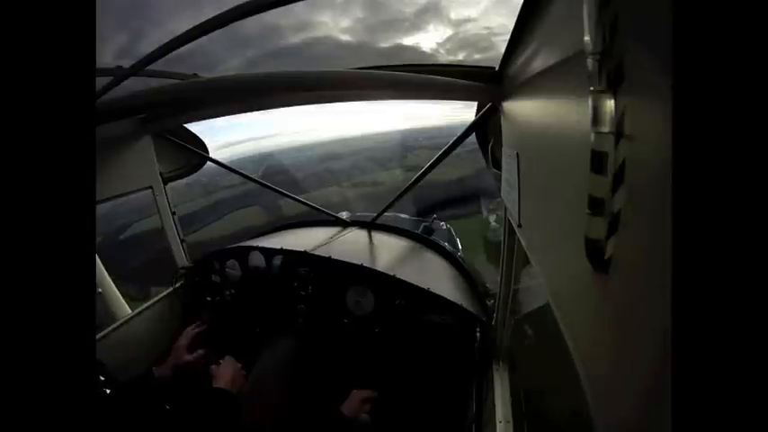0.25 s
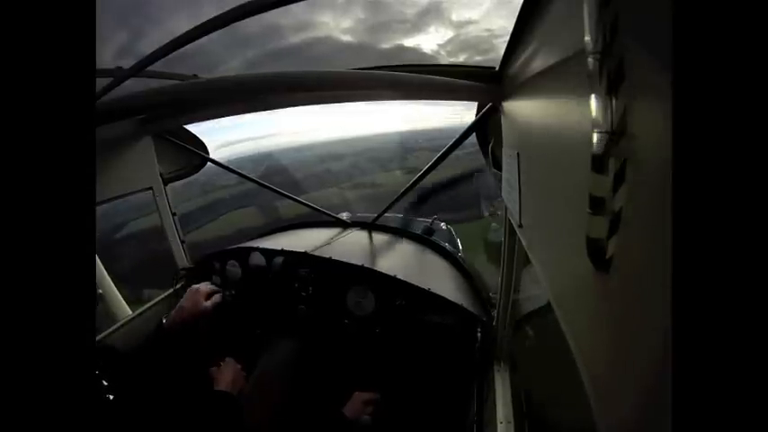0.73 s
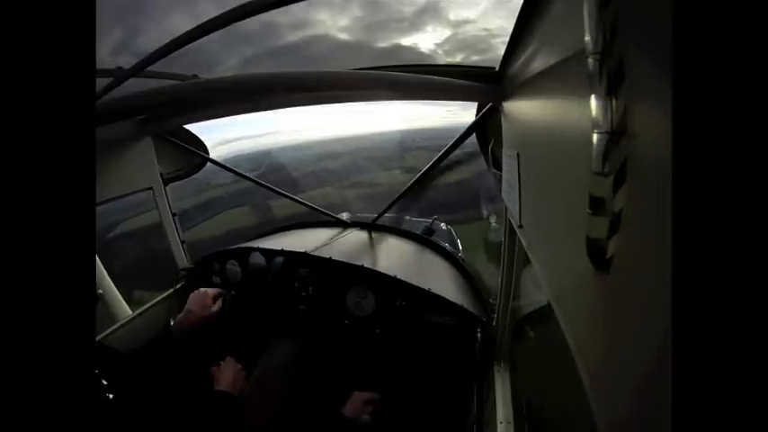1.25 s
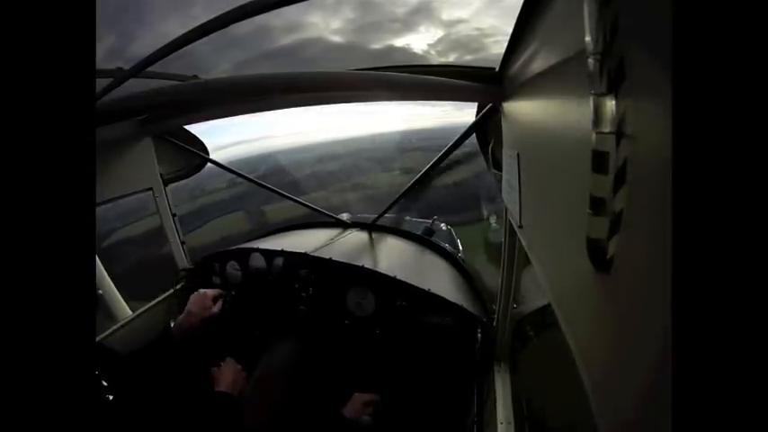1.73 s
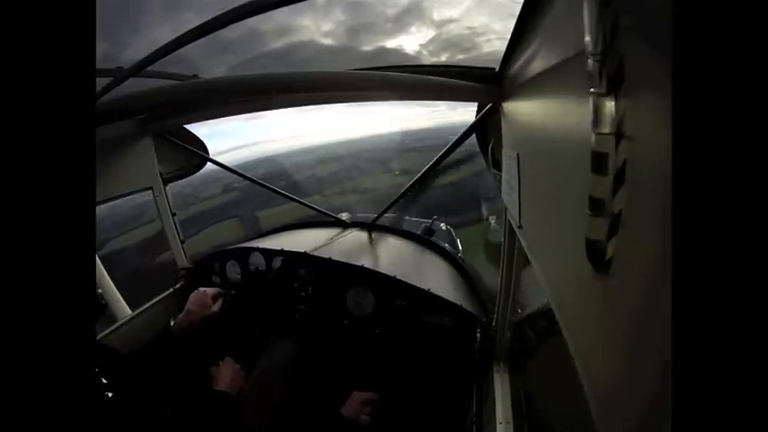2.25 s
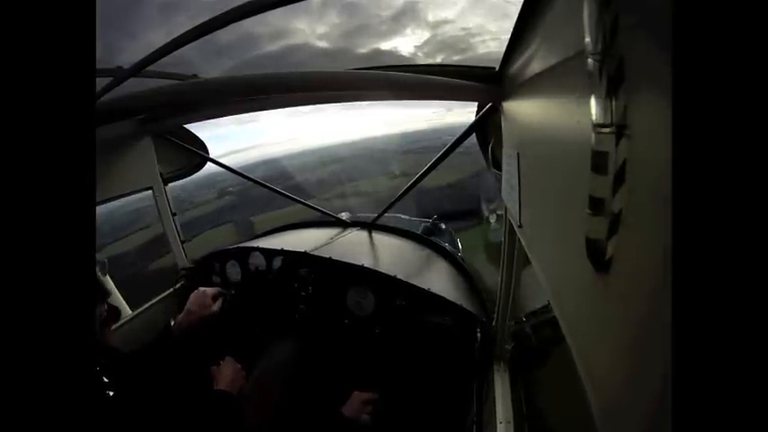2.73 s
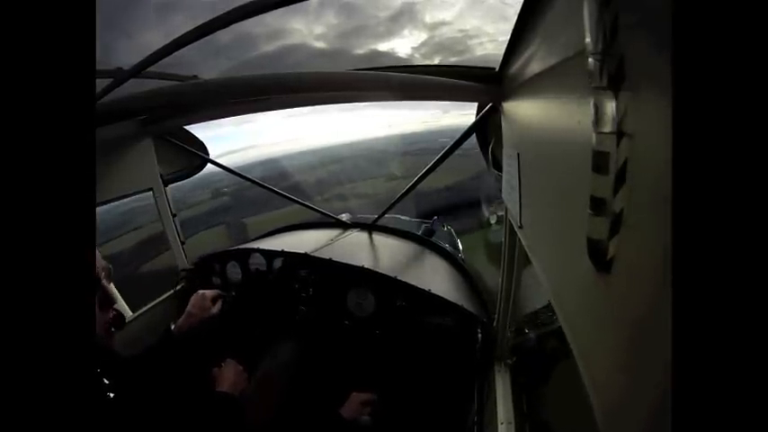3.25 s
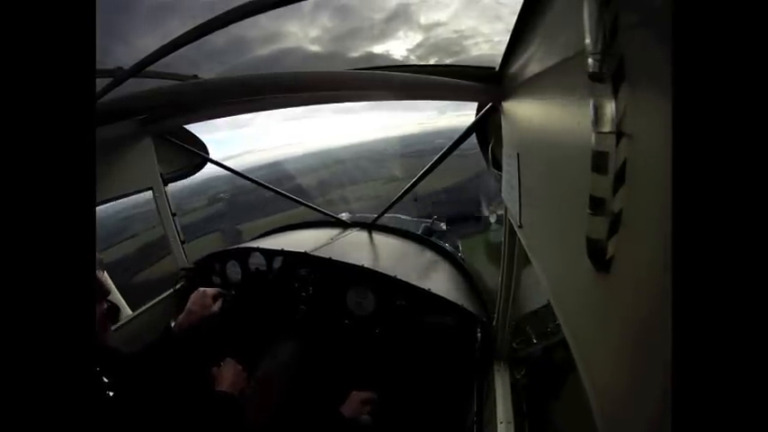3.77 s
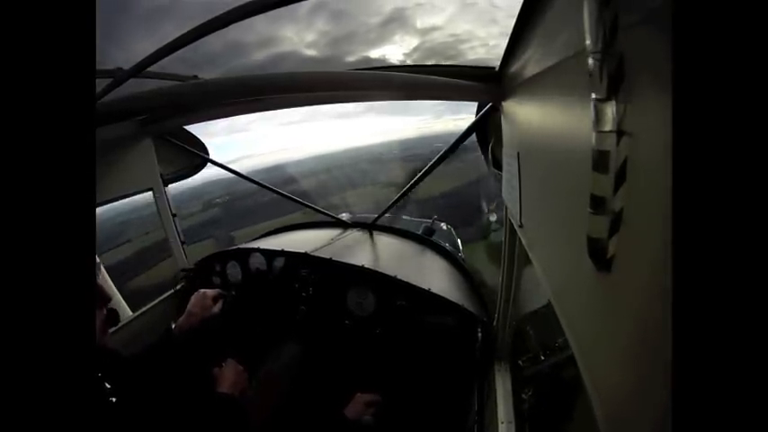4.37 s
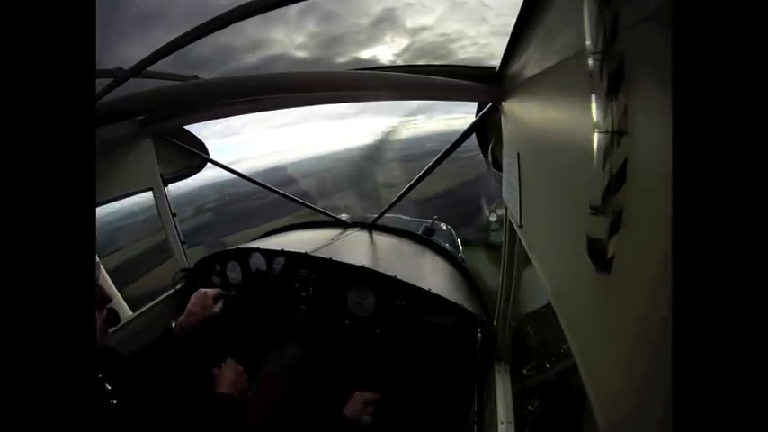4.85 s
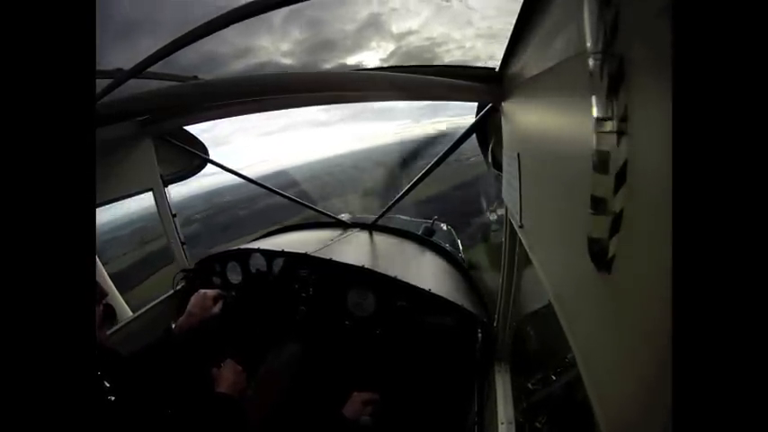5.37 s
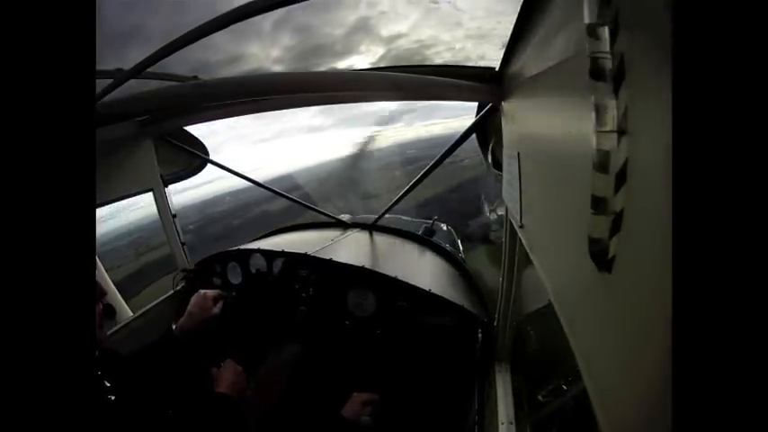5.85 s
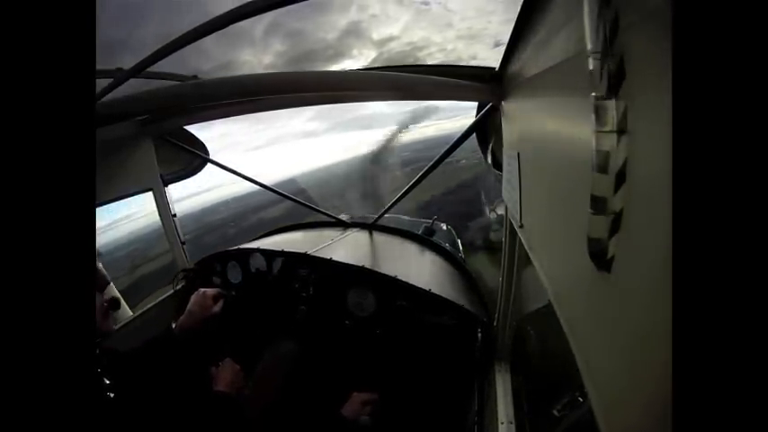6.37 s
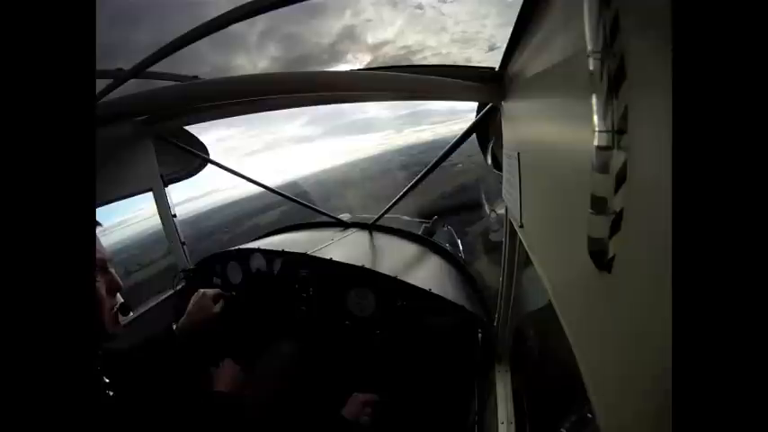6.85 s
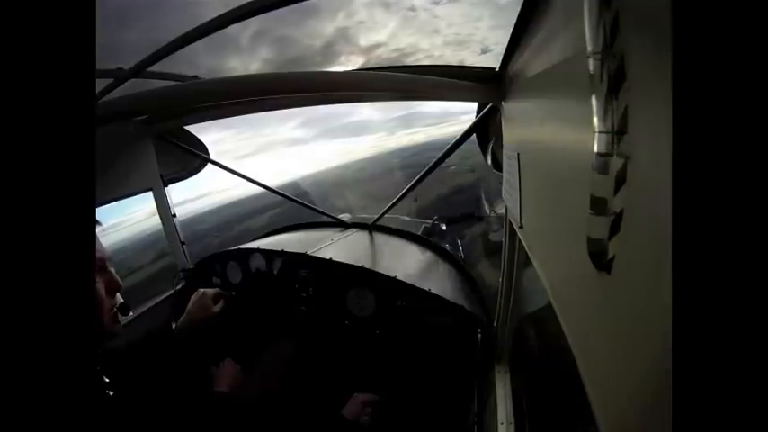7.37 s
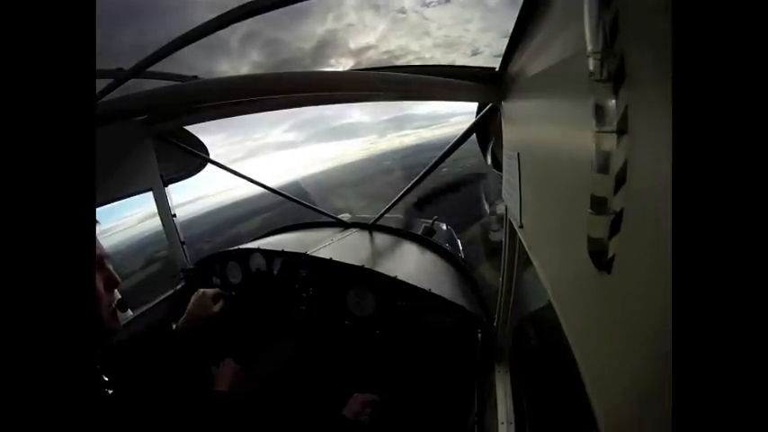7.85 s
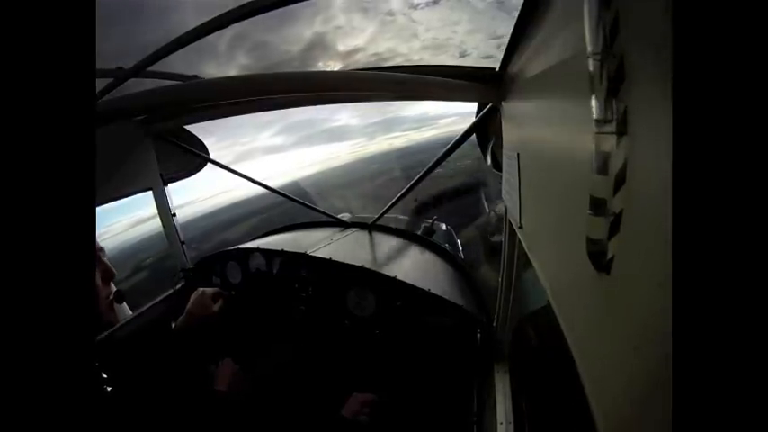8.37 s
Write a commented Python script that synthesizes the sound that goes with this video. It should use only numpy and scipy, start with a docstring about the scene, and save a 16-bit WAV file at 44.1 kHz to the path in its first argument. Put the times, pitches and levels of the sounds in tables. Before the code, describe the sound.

Close inside a cramped cockpit in flight, rushing air and low buffeting pulse with a four-cylinder engine's steady drone. Light panel knocks repeat quickly, while faint high whistles jump and glide. The opening is windiest and roughest; near three seconds the engine picks up slightly, its hum becoming plainer and firmer as the airflow drops. Wind then fluctuates, dipping near six seconds. Sound is centred, low-fidelity, with coarse treble.

```python
"""Inside the cabin of a light aircraft: a four-cylinder engine and its propeller drone at about 1500 rpm, as harmonics.
Strong airflow opens the scene: filtered noise hisses and buffets in step with the engine, and resonators knock.
An air leak whistles throughout, as gliding sines near three pitches; the main drone sinks briefly at 0.8 and 2.1 s.
Near 2.9 s the engine picks up: its main tone rises, most of its other tones weaken, and the airflow soon eases.
The airflow then swings about its usual strength, with a lull near 6 s; a 12 kHz sample-and-hold adds gritty treble."""
import sys
import numpy as np
from scipy import signal
from scipy.fft import rfft, irfft, next_fast_len
from scipy.io import wavfile

SR = 44100
rng = np.random.default_rng(int(sys.argv[2]) if len(sys.argv) > 2 else 0)


def to_wav(s):
    """Save 16-bit WAV."""
    ch = np.atleast_2d(s).T  # columns
    pcm = np.round(np.clip(ch, -1, 1) * 32767)  # PCM
    wavfile.write(sys.argv[1], SR, pcm.astype(np.int16))


N = 379701
TIME = np.arange(N) / SR  # s
FREQ = np.arange(N // 2 + 1) * SR / N  # Hz

# Strength of the slipstream on the cabin. Each row: time in seconds, level in dB about its usual strength.
AIRFLOW = [(0, 1.9), (.5, 3.5), (1.42, 3), (1.9, 0.9), (2.2, 2), (2.45, 1), (2.87, 1.8), (2.97, -0.5),
           (3.38, -3), (3.8, -0.2), (4.55, -.5), (5.15, 0.2), (5.55, 0), (5.95, -4.5), (6.32, -0.75),
           (7.7, 0.2), (8.25, -1.5), (8.61, 1.5)]
# Brief gusts and lulls. Each row: centre in seconds, length in seconds, hiss change in dB, buffeting change in dB.
GUSTS = [(0.445, .05, 2, 3.5), (0.882, 0.054, 0.5, 3.5), (1.09, 0.033, -0.5, -11), (2.044, 0.066, -3, 0),
         (2.143, 0.073, 4, 2.5), (2.669, .06, 3.5, 2.5), (3.086, 0.12, 2, 4.5), (3.81, 0.054, 3, 1),
         (4.182, .07, 3.5, 1.5), (5.17, 0.027, 2, 5), (6.34, .06, 3, 3), (6.99, 0.095, -4.5, -8),
         (8.389, 0.079, .5, 2.5), (8.547, 0.049, 1, 1)]
# Buffeting of the cabin skin. Each row: frequency in Hz, relative spectral density in dB per Hz.
BUFFET_SPECTRUM = [(12, -30), (22, -28), (32, -28), (46, -8.5), (60, 3), (80, -0.5), (115, -4.5),
                   (160, -2.5), (230, -9), (262, -17.5), (350, -18), (480, -29.5), (800, -46)]
# Slipstream hiss. Each row: frequency in Hz, relative spectral density in dB per Hz.
HISS_SPECTRUM = [(200, -21), (500, 0), (700, -4), (1050, -2), (1420, -3), (1700, 1), (2300, -1),
                 (2600, -0.5), (2780, -8), (3350, -11.5), (4100, -16), (5500, -17), (5900, -28),
                 (7000, -52)]
# Cabin panels and cavities rung by the hiss. Each row: centre in Hz, width in Hz, lift in dB.
PANELS = [(763, 133, 12), (896.8, 40, 12), (1197, 220, 8.5), (1884, 82, 6.5), (2048, 94, 6),
          (3092, 73, 10.5), (3665, 354, 10)]
# Surge of noise from each cylinder. Each row: place in the engine cycle from 0 to 1,
# mean height as a share of the steady noise.
SURGES = [(.24, 0.31), (.47, 0.2), (0.751, 0.21), (.97, 0.5)]
# Whistles of the air leak. Each row: start in seconds, end in seconds, mid pitch in Hz, glide in Hz per second,
# pitch flutter in Hz, mean level in dB.
WHISTLES = [ (0.03, 0.36, 2126, -9, 3.9, -31), (0.383, 0.582, 2420, 272, 12.4, -32.5),
            (0.596, 0.91, 2450, 29.5, 14.7, -35), (0.934, 1.069, 2570, 220.5, 16, -33),
            (1.091, 1.18, 2482, -54, 11.3, -31.5), (1.20, 1.51, 2169, 20, 7.4, -37),
            (1.57, 1.781, 2480, -89.5, 11.9, -31.5), (1.802, 2.151, 2472, -29.5, 15, -39.5),
            (2.20, 2.801, 2168, 29, 5.4, -35), (2.80, 3.14, 2181, 9.5, 4.6, -39),
            (3.209, 3.47, 2663, -71.5, 13, -40), (3.24, 3.457, 2536, -38, 9.3, -39),
            (3.55, 4.241, 2183, -9.5, 4.9, -38.5), (4.411, 4.489, 2632, 102, 11.5, -36),
            (4.544, 4.725, 2495, 121, 15.5, -39.5), (4.68, 4.81, 2645, -63, 14.3, -41.5),
            (4.84, 5.348, 2184, 1.5, 6.3, -40), (5.65, 5.93, 2545, -50.5, 13, -36),
            (5.63, 5.92, 2665, -62, 18, -46), (6.04, 6.80, 2182, 0.5, 4.7, -38.5),
            (7.02, 7.12, 2635, -200, 16, -40), (7.17, 8.607, 2181, -6.5, 3.78, -38.5), ]
# Knocks in each two-turn engine cycle. Each row: place in the cycle from 0 to 1, panel resonance in Hz,
# base width in Hz (each filter pass is 1.25 times as wide), level in dB before the common offset and the airflow.
KNOCKS = [(.70, 771, 56, -43.5), (1, 1180, 89, -44.5), (.22, 1910, 270, -50), (.46, 1313, 190, -52),
          (.73, 3130, 110, -50)]
# Engine speed. Each row: time in seconds, shaft turns per second in Hz.
SHAFT_SPEED = [(0.0, 24.81), (0.5, 24.9), (1.0, 24.86), (1.5, 25.09), (2.0, 24.98), (2.5, 25.12),
               (3.0, 25.18), (3.5, 25.45), (4.0, 25.47), (4.4, 25.25), (4.8, 25.24), (5.5, 25.49),
               (6.2, 25.43), (7.2, 25.38), (8.0, 25.55), (8.61, 25.24)]
# Engine tones besides the main one. Each row: multiple of shaft speed, relative peak level in dB
# before the engine picks up, relative peak level in dB after.
ORDERS = [(1.0, -46, -51), (1.5, -37, -44), (2.5, -23.5, -30.5), (3.0, -36, -45), (3.5, -30.5, -35),
          (4.0, -23, -28), (4.5, -48, -41.5), (5.5, -56, -40.5), (6.0, -33, -32.5), (6.5, -45, -42.5),
          (7.0, -52, -43.5), (7.5, -44, -46), (8.0, -34.5, -37.5), (9.0, -43, -44), (9.5, -44, -49.5),
          (11.0, -47, -52.5)]
# Brief changes of the main tone. Each row: centre in seconds, length in seconds, change in dB.
BLADE_DIPS = [(.78, 0.35, -9), (2.089, 0.12, -14)]

HISS_DB, BUFFET_DB, KNOCK_DB = -29, -23, -0.5  # hiss and buffeting levels, and knock offset, at the usual airflow
BUFFET_GROWTH = 1.14  # dB of buffeting per dB of airflow
GUST_RATE_HZ, HISS_GUST_DB, BUFFET_GUST_DB = 16, 0.5, 0.8  # turbulent flutter
PICK_UP_S, PICK_UP_LENGTH_S = 2.93, 0.11  # middle and length of the engine's pick-up
BLADE_DB, BLADE_PICK_UP_DB = -20, 3  # main tone at the usual airflow, and its rise at the pick-up
BLADE_LOSS = 0.38  # dB that the main tone loses per dB of airflow
HOLD_HZ, TOP_HZ = 12000, 15300  # sample-and-hold rate, low-pass edge


def amp(db):
    """Logarithmic level: every 20 dB multiplies the amplitude by ten."""
    return 10 ** (np.asarray(db) / 20)


def unit(x):
    """Power normalisation: scale to rms 1."""
    return x / np.sqrt(np.mean(x ** 2))


def curves(rows):
    """Linear interpolation: each column of a table after its times becomes a value per sample."""
    times, *columns = np.transpose(rows)
    return [np.interp(TIME, times, column) for column in columns]


def swell(centre, length):
    """Gaussian envelope: a smooth bump of height 1 around its centre in seconds."""
    return np.exp(-(2 * (TIME - centre) / length) ** 2)


def walk(rate):
    """Low-passed white noise: a random drift of rms 1, changing about rate times a second."""
    size = next_fast_len(N, real=True)
    hz = np.arange(size // 2 + 1) * SR / size
    spectrum = rfft(rng.standard_normal(size)) * np.exp(-(hz / rate) ** 2)
    return unit(irfft(spectrum, size)[:N])


def noise(spectrum, resonances=()):
    """Spectral shaping: white noise takes a smooth spectrum, lifted at each resonance."""
    hz, db = np.transpose(spectrum)
    shape = np.interp(np.log(FREQ + 1), np.log(hz), db)
    for centre, width, lift in resonances:
        shape = shape + lift / (1 + (2 * (FREQ - centre) / width) ** 2)
    return unit(irfft(rfft(rng.standard_normal(N)) * amp(shape), N))


def ring(x, hz, width):
    """Cascaded resonance: one peak filter applied twice for steep skirts."""
    b, a = signal.iirpeak(hz, hz / width, fs=SR)
    once = signal.lfilter(b, a, x)
    return signal.lfilter(b, a, once)


def airflow():
    """Flow-driven noise: hiss and buffeting levels in dB follow the slipstream, its gusts and its turbulence."""
    hiss_db = curves(AIRFLOW)[0] + HISS_GUST_DB * walk(GUST_RATE_HZ)
    buffet_db = BUFFET_GROWTH * hiss_db + BUFFET_GUST_DB * walk(GUST_RATE_HZ)
    for centre, length, gust_hiss_db, gust_buffet_db in GUSTS:
        gust = swell(centre, length)
        hiss_db = hiss_db + gust_hiss_db * gust
        buffet_db = buffet_db + gust_buffet_db * gust
    return hiss_db, buffet_db


def surging(cycle, width=0.09, uneven=0.37):
    """Periodic amplitude modulation: four swells per engine cycle, one for each cylinder, scaled to rms 1."""
    swells = 0
    for place, height in SURGES:
        distance = (cycle - place + 0.5) % 1 - 0.5  # in cycles, from the nearest surge
        swells = swells + height * np.exp(-(distance / width) ** 2)
    return unit(1 + swells * (1 + uneven * walk(23)))


def buffeting(buffet_db, surge):
    """Forced vibration: the gusty slipstream shakes the cabin skin as low noise, in step with the engine."""
    return amp(BUFFET_DB + buffet_db) * surge ** 0.88 * noise(BUFFET_SPECTRUM)


def hiss(hiss_db, surge):
    """Turbulent broadband noise: the slipstream excites the panels and cavities, in step with the engine."""
    return amp(HISS_DB + hiss_db) * surge * noise(HISS_SPECTRUM, PANELS)


def whistle(attack_s=0.03, release_s=0.09, sag_db=0.5, shake_db=2.0):
    """Edge tone: a leak's jet catches quickly, glides, weakens and dies; turbulence shakes its pitch and strength."""
    shake, out = walk(55.0), 0
    for start, end, hz, glide, flutter, db in WHISTLES:
        fade = np.minimum((TIME - start) / attack_s, (end - TIME) / release_s)
        gate = np.clip(fade + 0.5, 0, 1)
        from_middle = np.clip(TIME, start, end) - (start + end) / 2
        pitch = hz + glide * from_middle + flutter * shake
        size = gate * amp(db - sag_db * from_middle / (end - start))
        out = out + size * np.sin(2 * np.pi * np.cumsum(pitch) / SR)
    return np.sqrt(2) * amp(shake_db * walk(25)) * out


def knocks(cycle, scatter_db=1.5, jitter_s=0.00009):
    """Impulse response: once a cycle each knock rings its panel, never quite equally hard or on time."""
    out = 0
    for place, hz, width, db in KNOCKS:
        times = np.interp(np.arange(int(cycle[-1])) + place, cycle, TIME)
        late, size = rng.standard_normal((len(times), 2)).T
        samples = np.clip((times + jitter_s * late) * SR, 0, N - 1).astype(int)
        blows = np.zeros(N)
        blows[samples] = amp(scatter_db * size)
        out = out + amp(db) * unit(ring(blows, hz, 1.25 * width))
    return out


def drone(turns, blade_waver_db=0.5, tones_db=2.0, waver_db=1.5, slip=0.16):
    """Harmonic series: two blades and two firings a turn make the main tone; unequal cylinders add half orders."""
    picked_up = np.clip((TIME - PICK_UP_S) / PICK_UP_LENGTH_S + 0.5, 0, 1)
    main_db = BLADE_DB + BLADE_PICK_UP_DB * picked_up
    # the main tone sinks as the airflow noise grows, as under automatic gain control
    main_db = main_db - BLADE_LOSS * curves(AIRFLOW)[0]
    main_db = main_db + blade_waver_db * walk(8.2)
    for centre, length, db in BLADE_DIPS:
        main_db = main_db + db * swell(centre, length)
    out = np.sqrt(2) * amp(main_db) * np.sin(2 * np.pi * 2 * turns)
    for order, before_db, after_db in ORDERS:
        db = before_db + (after_db - before_db) * picked_up
        db = db + tones_db + waver_db * walk(7.3)
        half_order = np.round(2 * order) / 2
        phase = 2 * np.pi * (half_order * turns + rng.random()) + slip * walk(4.6)  # slip in radians
        out = out + amp(db) * np.sin(phase)
    return out


def scene():
    """Superposition: engine, airflow and air leak add at one point in the cabin, alike in both channels."""
    turns = np.cumsum(curves(SHAFT_SPEED)[0]) / SR
    cycle = turns / 2  # a four-stroke repeats every two turns
    hiss_db, buffet_db = airflow()
    surge = surging(cycle)
    wind = buffeting(buffet_db, surge) + hiss(hiss_db, surge)
    clatter = amp(KNOCK_DB + hiss_db) * knocks(cycle)
    cabin = wind + whistle() + clatter + drone(turns)
    return np.array([cabin, cabin])


def record(dry):
    """Zero-order hold: holding each 12 kHz sample mirrors the sound faintly into the treble, then a low-pass."""
    slow = signal.resample_poly(dry, HOLD_HZ, SR, axis=1)
    stepped = np.repeat(slow, 4, axis=1)
    held = signal.resample_poly(stepped, SR, 4 * HOLD_HZ, axis=1)[:, :N]
    low_pass = signal.ellip(10, 0.2, 80, TOP_HZ, fs=SR, output="sos")
    return signal.sosfilt(low_pass, held)


dry = scene()
out = record(dry)
to_wav(out)
```